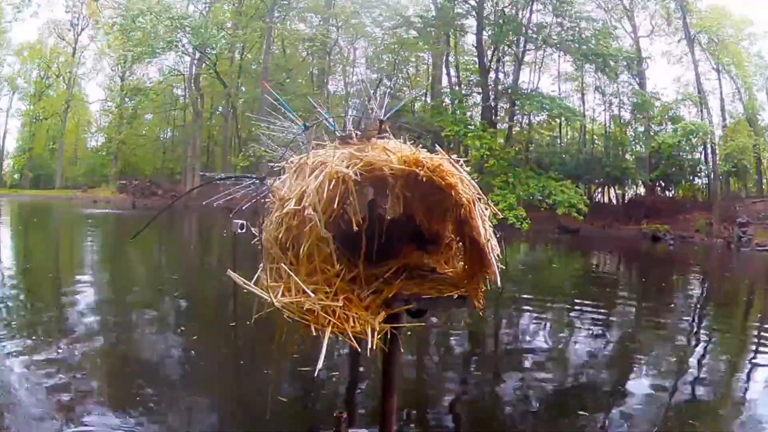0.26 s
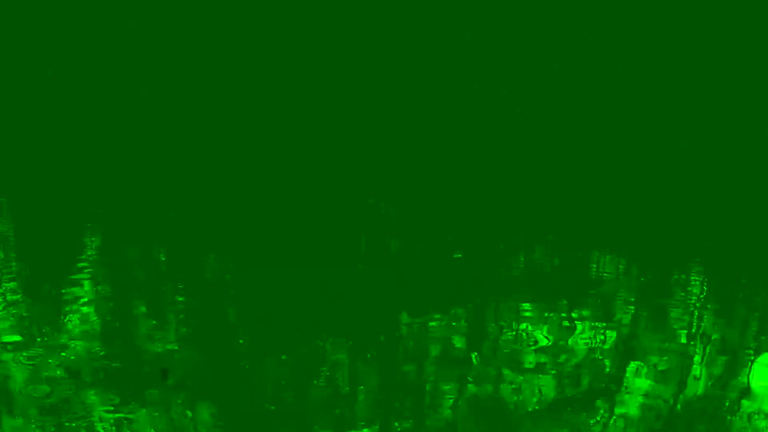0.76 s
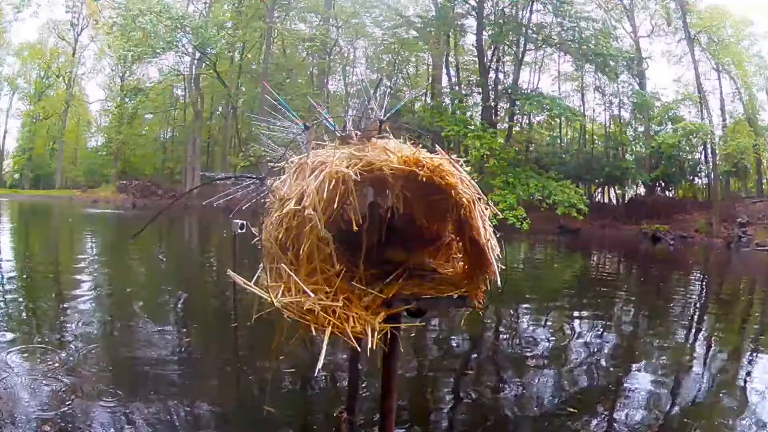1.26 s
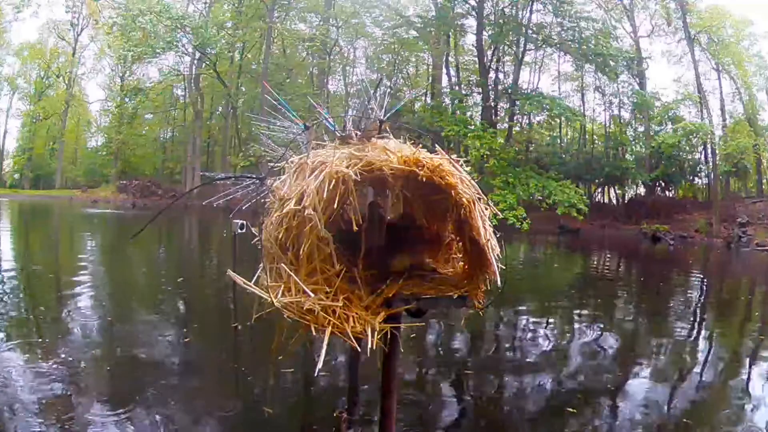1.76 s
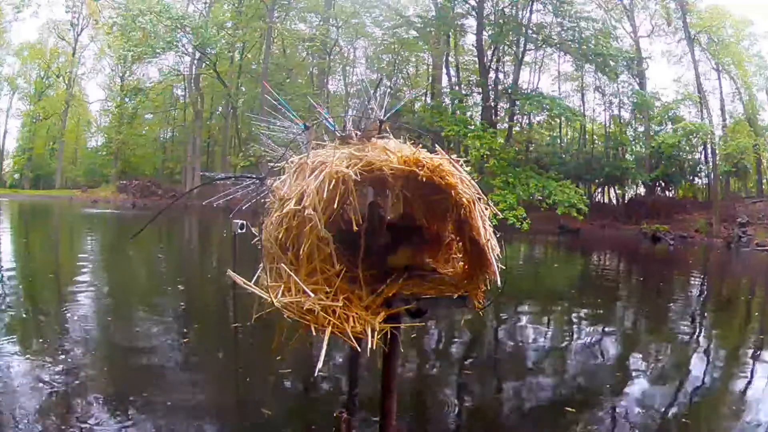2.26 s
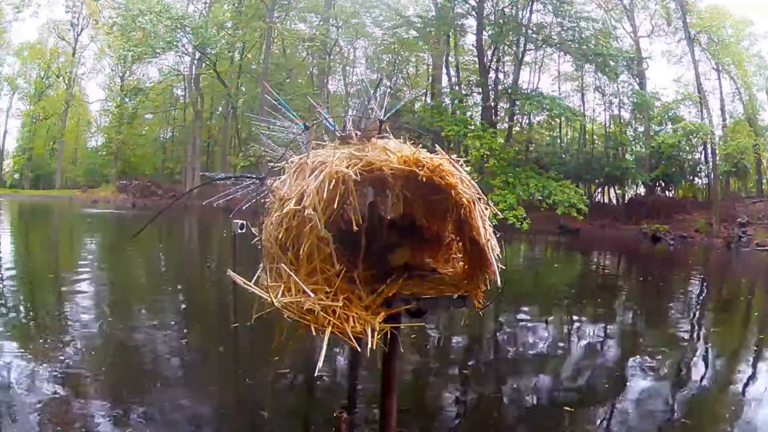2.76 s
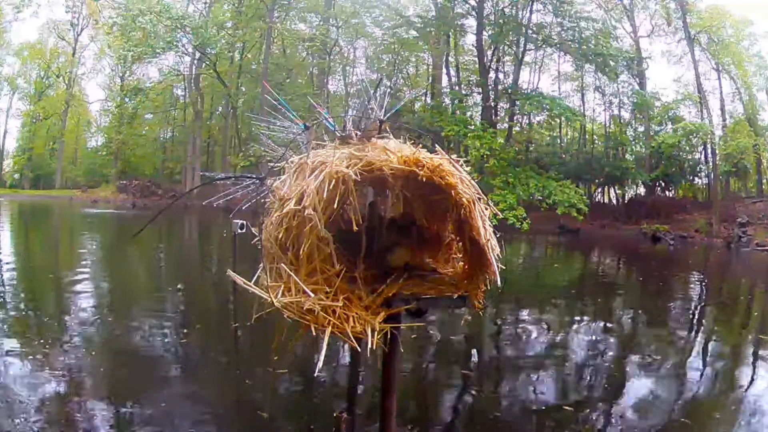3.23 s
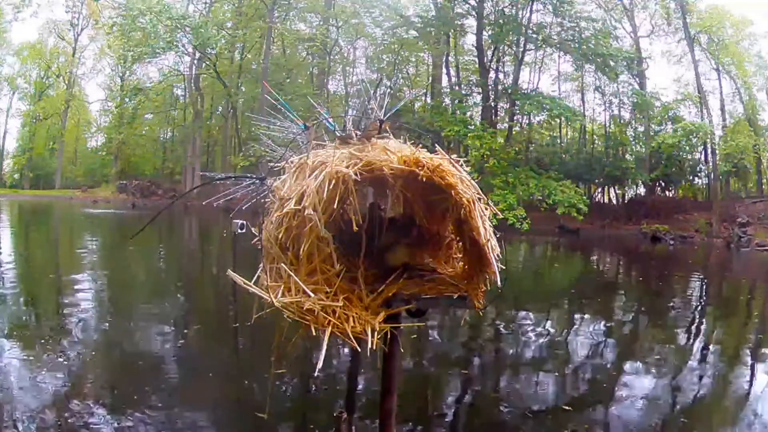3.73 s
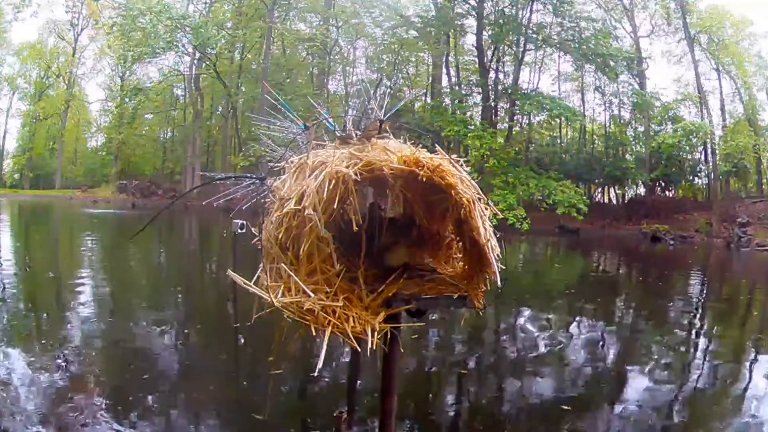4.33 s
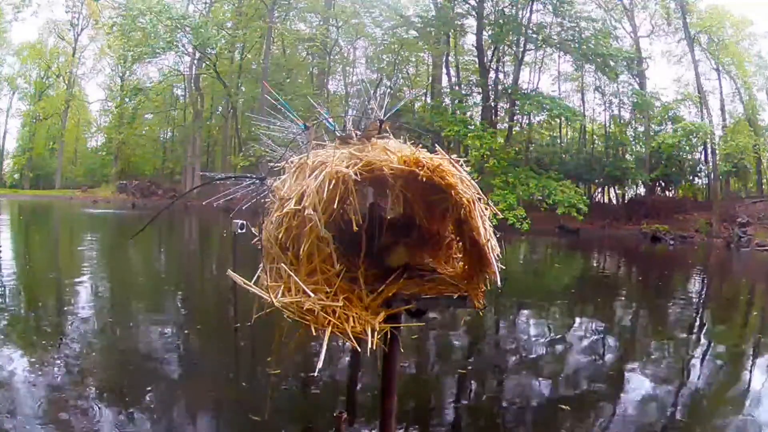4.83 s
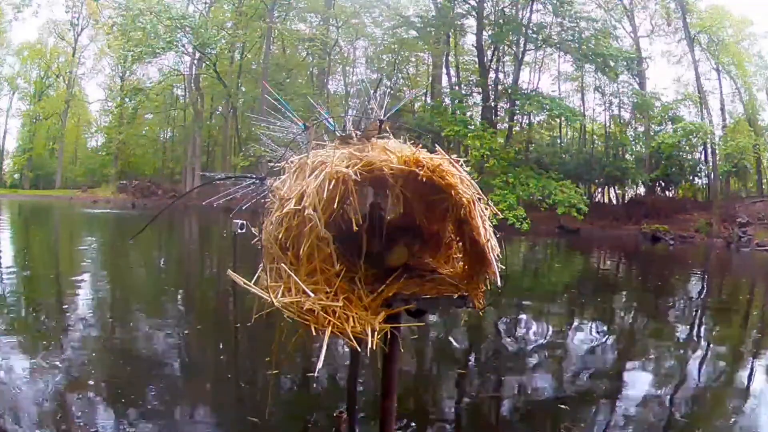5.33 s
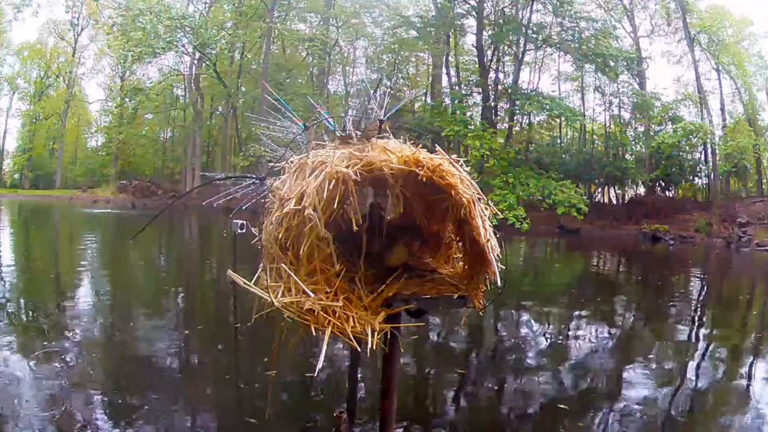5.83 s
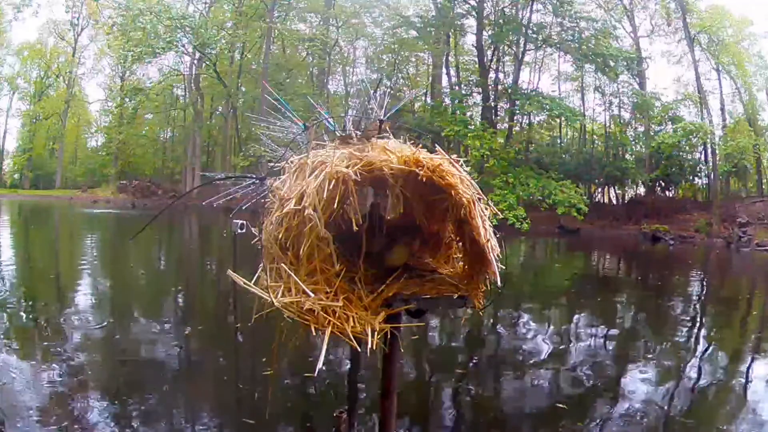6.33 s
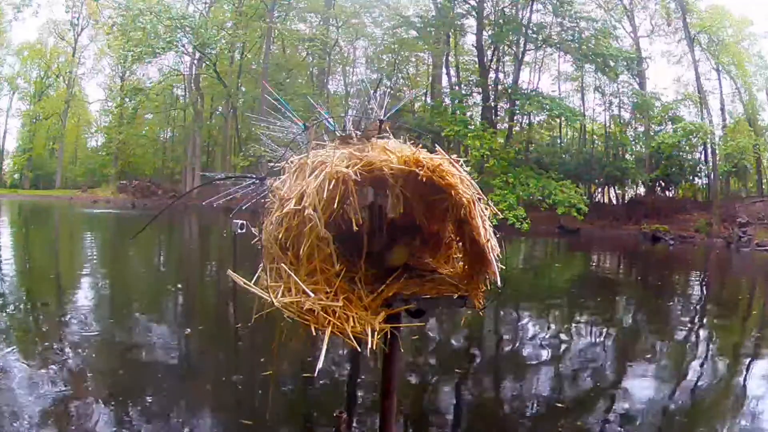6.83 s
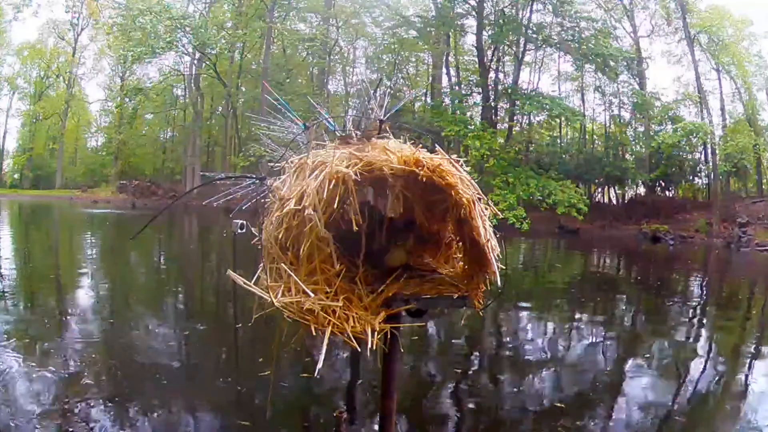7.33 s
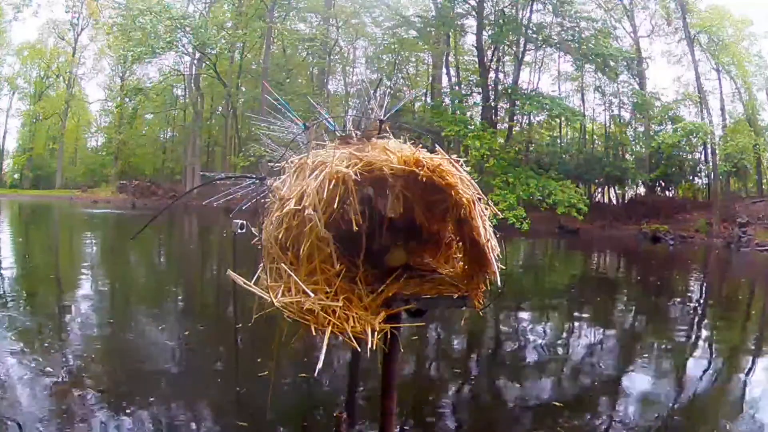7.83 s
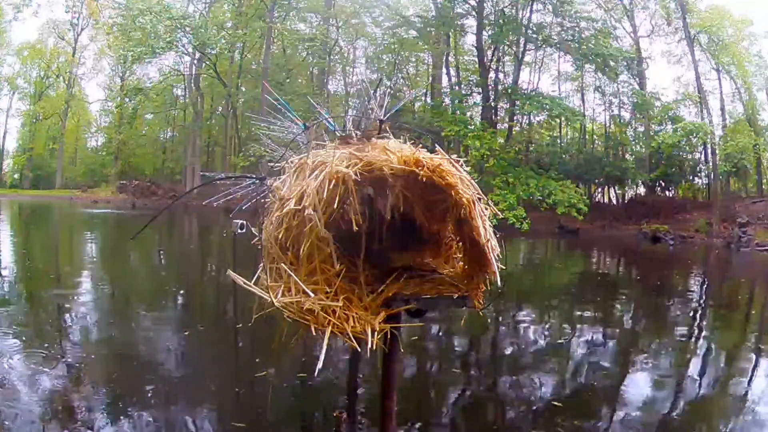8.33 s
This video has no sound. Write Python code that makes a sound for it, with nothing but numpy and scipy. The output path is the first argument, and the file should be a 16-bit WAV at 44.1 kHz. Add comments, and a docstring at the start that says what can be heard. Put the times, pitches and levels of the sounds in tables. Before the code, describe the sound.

A few faint, high calls carry across a wooded pond. From about 0.5 seconds, ducklings peep close to a small microphone at a nest, giving short, high whistles about four or five times a second until roughly 3.3 seconds. The louder peeps break up with a buzzy, stuttering crackle and leave a thin ring. The peeping then becomes sparser, with strong peeps near 4.4 and 6 seconds. Softer, slightly lower peeps follow, turning faint from 7.5 seconds to the end at about 8.5. Distant peeps answer throughout, blurred and lightly echoed by the trees. A quiet, raspy, rattling duck call joins around 1.6 to 2 seconds, 4.1 to 4.8, near 6.8, and from 7.8 to 8.4. Underneath lie a quiet hiss and a faint, low equipment hum that pulses about once a second.

```python
"""Faint calls cross a pond, then ducklings peep close to a small microphone at a straw nest.
Each peep is a whistle on an arch of pitch; fainter ones answer, blurred and echoed by the woods.
A raspy, rattling call, perhaps the hen's, joins in now and then: uneven pulses ringing a throat.
Under it lie quiet hiss and a faint, beating equipment hum.
The sound breaks up on the peeps: they crackle, and the cracks stutter fifty times a second."""
import sys
import numpy as np
from scipy import signal
from scipy.fft import rfft, irfft
from scipy.io import wavfile
from scipy.ndimage import uniform_filter1d

SR = 44100
rng = np.random.default_rng(int(sys.argv[2]) if len(sys.argv) > 2 else 0)


def transcribe(u):
    """Save the signal u as a 16-bit wav file named by the first command-line argument.

    u: samples, shape (n,) or (channels, n), limited to [-1, 1]; the rate is SR.
    q: integer samples, one column per channel.
    """
    v = np.clip(np.atleast_2d(u).T, -1, 1)
    q = np.round(v * 32767).astype(np.int16)
    wavfile.write(sys.argv[1], SR, q)


N = 378378
TIME_S = np.arange(N) / SR

# Filter curves for three noises and the microphone. Each row: frequency in Hz, gain in dB.
AIR_CURVE = [(15, -25.5), (30, -12), (55, -13), (90, -13.5), (200, -15), (400, -14), (800, -21),
             (1500, -22.5), (2100, -17.5), (2700, -18.5), (4800, -18.5), (5500, -22.5), (8000, -28.5),
             (10000, -68.5)]
RASP_HISS_CURVE = [(100, -19.5), (500, 0.5), (1000, 3.5), (1700, 5), (3000, -29.5), (4200, 0), (6000, -1.5),
                   (8000, -17.5)]
FIZZ_CURVE = [(60, -10), (500, -10.5), (1200, -15.5), (2200, -6), (3000, -7), (4000, -3), (4700, 4.5),
              (5600, -8.5), (6800, -8.5), (8000, -23.5)]
MICROPHONE_CURVE = [(30, -1), (100, 1), (250, 1.5), (700, -1), (1300, 0.5), (2200, 0), (2900, -1),
                    (3800, -0.5), (4800, -0.5), (5600, -0.5), (6500, 1.5), (7200, -4.5), (7900, -17)]
# Rasps, near or far. Each row: start and end in seconds, level in dB.
RASP_CALLS = [(0.01, 0.047, -64.5), (0.239, 0.298, -67), (1.623, 1.767, -61), (1.78, 2.084, -63.5),
              (4.117, 4.187, -56), (4.228, 4.318, -57.5), (4.37, 4.453, -53), (4.535, 4.613, -57),
              (4.777, 4.825, -54.5), (6.764, 6.83, -52), (6.821, 6.889, -49), (7.802, 7.88, -57.5),
              (7.883, 7.953, -53.5), (7.97, 8.053, -65), (8.054, 8.173, -52), (8.196, 8.303, -65),
              (8.303, 8.421, -50.5)]
# Runs of cracks that stand out of the crackle. Each row: time in seconds, size in dB, count.
CRACK_RUNS = [(0.541, -27.5, 2), (0.5509, -22.5, 1), (0.5857, -26.5, 2), (0.791, -26, 1),
              (0.8343, -19.5, 3), (0.845, -26, 8), (0.8514, -24, 2), (1.0511, -31, 1), (1.1, -21, 2),
              (1.1063, -24, 2), (1.1509, -29.5, 3), (1.346, -29.5, 3), (1.3698, -23.5, 2),
              (1.3816, -24.5, 1), (1.415, -23, 2), (1.4722, -30, 3), (1.9855, -36.5, 2), (2.15, -25, 1),
              (2.1856, -24.5, 2), (2.3772, -29.5, 2), (2.6257, -33, 3), (2.6983, -28, 2),
              (2.7256, -38.5, 4), (2.9517, -26, 2), (3.0065, -31, 3), (3.2102, -34, 2), (4.4266, -30.5, 1),
              (4.4855, -31, 6), (5.505, -36.5, 2), (6.0471, -24, 1), (6.0815, -34, 3), (7.042, -31, 3),
              (8.13, -39, 3)]
# Calls from across the water. Each row: start and end in seconds, level in dB, pitch and drop in Hz.
ANSWER_CALLS = [(0.04, 0.106, -56.5, 3730, 340), (0.227, 0.309, -53, 4320, 66),
                (0.302, 0.346, -46.5, 3930, 23), (0.408, 0.516, -52, 4990, 126),
                (0.703, 0.795, -50.5, 4990, 400), (2.534, 2.598, -52, 5110, 20),
                (2.815, 2.914, -49.5, 5170, 24), (3.179, 3.244, -49, 5125, 53),
                (4.294, 4.385, -59.5, 5140, 150), (4.613, 4.737, -55.5, 5080, 24),
                (4.771, 4.839, -53, 3534, 370), (5.798, 5.917, -55.5, 3780, 380),
                (7.335, 7.409, -48, 4720, 27), (7.457, 7.483, -51, 4540, 18), (7.65, 7.729, -49, 4234, 95)]
# Quick flicks of the voice around peeps.
# Each row: start and end in seconds, level in dB, first and last pitch in Hz.
VOICE_FLICKS = [(0.353, 0.361, -41.5, 4040, 4350), (0.8, 0.807, -24, 4470, 4480),
                (0.884, 0.898, -47.5, 4700, 3650), (1.04, 1.046, -39.5, 4800, 4560),
                (1.061, 1.067, -28.5, 4730, 4655), (1.667, 1.679, -49.5, 4650, 3610),
                (2.053, 2.065, -43, 4500, 3570), (2.073, 2.08, -41, 4770, 3800),
                (2.128, 2.134, -45.5, 3930, 4610), (2.136, 2.15, -35, 4720, 4340),
                (2.229, 2.237, -46.5, 4740, 3600), (2.9, 2.906, -28.5, 4370, 4600),
                (3.011, 3.027, -36.5, 4720, 3745), (3.031, 3.043, -36.5, 4600, 3870),
                (3.202, 3.214, -43, 4050, 4550), (3.288, 3.302, -30, 4904, 4580),
                (3.329, 3.343, -40, 4730, 3500), (4.002, 4.012, -33.5, 4420, 4700),
                (4.098, 4.119, -52, 4410, 3580), (4.456, 4.462, -30, 4850, 4750),
                (4.46, 4.486, -48.5, 4470, 3800), (4.743, 4.769, -55.5, 4650, 3900),
                (5.042, 5.057, -59.5, 5050, 4450), (5.378, 5.375, -54, 5200, 4700),
                (5.616, 5.63, -45.5, 5290, 4770), (6.776, 6.784, -50, 3950, 3650)]
# Shredded tails trailing peeps. Each row: start and end in seconds, level in dB, pitch in Hz.
PEEP_TAILS = [(1.131, 1.201, -40, 4787), (2.35, 2.41, -38.5, 4784), (2.67, 2.723, -37, 4884),
              (4.431, 4.473, -37, 4795), (5.692, 5.72, -52.5, 4830), (6.458, 6.509, -46, 3950),
              (6.78, 6.817, -47, 4035), (7.085, 7.145, -49, 4080), (8.423, 8.495, -56, 4780)]
# Peeps at the nest. Each row: start and end in seconds, level in dB, mid pitch in Hz,
# start-to-end glide in Hz, raggedness from 0 to 1, fade in seconds.
NEST_PEEPS = [(0.498, 0.559, -33, 4554, 95.5, 0.99, .027), (0.561, 0.621, -30.5, 4600, -6.5, 0.73, .001),
              (0.808, 0.879, -27.5, 4690, -100, 0.33, .001), (1.069, 1.133, -29, 4733, -20.5, 0.53, .002),
              (1.32, 1.404, -30.5, 4787, -110, 0.22, .001), (1.408, 1.476, -33, 4810, 60, 0.5, .004),
              (1.575, 1.669, -28.5, 4760, -150, 0.04, .014), (1.853, 1.943, -29, 4785, -170, 0, .013),
              (1.943, 2.045, -37.5, 4737, 59, 0.41, .004), (2.151, 2.228, -29.5, 4764, -110, 0.25, 0.013),
              (2.266, 2.337, -32, 4677, 89, 0.28, 0.011), (2.6, 2.668, -31.5, 4674, 26.5, 0.3, .001),
              (2.918, 3.003, -29.5, 4830, 55, 0.31, .018), (3.239, 3.321, -38.5, 4767, -49.5, 0.48, .016),
              (3.586, 3.69, -37.5, 4725, 190, 0.72, 0.0075), (4.007, 4.04, -41, 4830, -40, 0, 0.007),
              (4.066, 4.096, -32.5, 4750, -83, 0.8, .015), (4.382, 4.424, -26.5, 4680, 71.5, .15, 0.019),
              (5.068, 5.166, -42.5, 4330, 178.5, 0.65, .006), (5.375, 5.487, -37, 4606, 2, 0.8, .008),
              (5.617, 5.688, -38.5, 4773, -130, 0.46, .011), (5.998, 6.066, -30.5, 4663, 30.5, .2, .003),
              (6.083, 6.191, -42, 4073, -28.5, 0.75, .011), (6.38, 6.465, -40, 4120, -70, 0.32, .009),
              (6.694, 6.774, -40, 4090, -20, 0.44, 0.0039), (7.015, 7.086, -40.5, 4122, -100, 0.31, .002),
              (7.334, 7.406, -43, 4125, -19, 0.6, .002), (7.587, 7.654, -53, 4670, -480, 1, 0.0022),
              (7.732, 7.793, -48, 4830, 118.5, 0.64, .006), (7.818, 7.948, -52.5, 4695, -66.5, 0.42, .01),
              (7.956, 8.057, -49.5, 4203, -400, 0.22, .007), (8.099, 8.238, -56, 4830, -91, 0.21, 0.0045),
              (8.355, 8.432, -43.5, 4760, -54, 0.54, .008)]

STUTTER_S = .02
CRACKLE_DB, LOUD_PEEP_DB, CRACKLE_DB_PER_DB = -33, -31, .5  # size on a loud peep; slope with level
CRACKLE_WAIT_S, CRACKLE_FULL_RAGGED = .016, 0.37
ANSWER_EARLY_SHARE, ANSWER_RAGGED, ANSWER_FADE_S = .9, .85, 0.0062  # share: of the drop, in first half
FLICK_ARCH_HZ, FLICK_RAGGED, FLICK_FADE_S = 130, 0.28, .003
SCOOP_S, SCOOP_DB, SCOOP_HZ = .012, -22, 450  # faint slide up into each peep
TAIL_SAG_HZ, TAIL_RAGGED, TAIL_FADE_S = 130, 0.96, 0.0019
CLEAN_ARCH_HZ, BROKEN_ARCH_HZ, FLAT_RAGGED = 225, 40, .09  # a little raggedness flattens the arch


def amp(db):
    return 10 ** (np.asarray(db) / 20)


def unit_rms(x):
    return x / np.sqrt(np.mean(x ** 2) + 1e-20)


def colour(x, curve):
    """Filter by a curve of (Hz, dB) points."""
    hz, db = np.transpose(curve)
    gain_db = np.interp(np.log(np.fft.rfftfreq(N, 1 / SR) + 1), np.log(hz), db)
    return irfft(rfft(x) * amp(gain_db), N)


def drift(hz):
    """Smooth noise of rms 1, bandwidth about hz."""
    lowpass = np.exp(-(np.fft.rfftfreq(N, 1 / SR) / hz) ** 2)
    return unit_rms(irfft(rfft(rng.standard_normal(N)) * lowpass, N))


def resonate(x, hz, width_hz):
    """One damped resonance."""
    radius = np.exp(-np.pi * width_hz / SR)
    return signal.lfilter([1 - radius], [1, -radius * np.exp(2j * np.pi * hz / SR)], x).real


def stutter(x, feedback):
    """Part of the sound returns every stutter period: a buzzy grain, rms 1."""
    size = round(STUTTER_S * SR)
    blocks = np.pad(x, (0, -N % size)).reshape(-1, size)
    return unit_rms(signal.lfilter([1], [1, -feedback], blocks, axis=0).ravel()[:N])


def air(level_db=-65, flicker_db=1.7):
    """Quiet, flickering hiss of pond and woods."""
    gain = amp(level_db + flicker_db * drift(74))
    return gain * stutter(colour(rng.standard_normal(N), AIR_CURVE), 0.32)


def hum(hz=151.1, waver=0.004, level_db=-69.5, beat_s=.926, crest_s=0.35, second_tone_db=-5.5):
    """Two low equipment tones, almost in tune, beat about once a second."""
    turns = np.cumsum(hz * (1 + waver * drift(6.4))) / SR
    slip = (TIME_S - crest_s) / beat_s
    second_tone = amp(second_tone_db) * np.sin(2 * np.pi * (turns - slip))
    return amp(level_db) * unit_rms(np.sin(2 * np.pi * turns) + second_tone)


def woods(x, t60_s, wet_db):
    """Trees round the pond return a thin tail."""
    t = TIME_S[:SR]
    tail = rng.standard_normal(SR) * amp(-60 * t / t60_s) * (1 - np.exp(-t / 0.015))
    return amp(wet_db) * signal.fftconvolve(x, tail / np.linalg.norm(tail))[:N]


def far_field(peeps, limit_db=-44):
    """Near or far, ducklings are about equally loud at the trees, so faint ones are wettest."""
    return peeps.real / (1 + abs(peeps) / amp(limit_db))


def scatter(x, t60_s=0.044, gain_db=1.0):
    """Many short paths blur far voices; the level follows the input."""
    t = TIME_S[:SR // 4]
    paths = rng.standard_normal(len(t)) * amp(-60 * t / t60_s)
    blurred = signal.fftconvolve(x, paths / np.linalg.norm(paths))[:N]
    power_in, power_out = abs(uniform_filter1d(np.array([x, blurred]) ** 2, size=3500)) + 1e-10
    return amp(gain_db) * blurred * np.sqrt(power_in / power_out)


def ringing(peeps, hz=4780, width_hz=110):
    """A faint narrow ring hangs on after the peeps."""
    tail = woods(far_field(peeps), t60_s=1.9, wet_db=3)
    return resonate(resonate(tail, hz, width_hz), hz, width_hz)


def rasp_gate(start_s, end_s, attack_s=.008, release_s=0.011):
    """Opens quickly, holds, dies away after the end."""
    attack = np.clip((TIME_S - start_s) / attack_s, 0, 1)
    return attack * np.exp(-np.clip((TIME_S - end_s) / release_s, 0, 20))


def rasp(pulse_hz=150, jitter=.22, throat_hz=2140, puff_turns=0.74, hiss_db=-12):
    """Uneven pulses, each with a noise puff, ring one throat resonance; some wide hiss goes along."""
    turns = np.cumsum(pulse_hz * (1 + jitter * drift(100))) / SR
    puffs = unit_rms(np.exp(-(turns % 1) / puff_turns) * rng.standard_normal(N))
    pulses = unit_rms(np.diff(np.floor(turns), prepend=0))
    throat = puffs + pulses
    for width_hz in (400, 1100, 1100):
        throat = resonate(throat, throat_hz, width_hz)
    hiss = amp(hiss_db) * unit_rms(colour(puffs, RASP_HISS_CURVE))
    voice = stutter(unit_rms(throat) + hiss, 0.42)
    voice /= np.sqrt(uniform_filter1d(voice ** 2, size=1100))  # level held over 25 ms
    envelope = np.max([amp(db) * rasp_gate(start_s, end_s) for start_s, end_s, db in RASP_CALLS], axis=0)
    return envelope * voice


def fizz(blips, gain_db=-12):
    """Buzzy hiss round the cracks."""
    envelope = np.sqrt(abs(uniform_filter1d(uniform_filter1d(blips ** 2, size=882), size=441)))
    return amp(gain_db) * envelope * stutter(colour(rng.standard_normal(N), FIZZ_CURVE), 0.8)


def crackle_envelope():
    """Stronger on loud, ragged peeps and tails; zero between them."""
    envelope = np.zeros(N)
    for start_s, end_s, db, *_, ragged, _ in peep_notes():
        crack_db = CRACKLE_DB + CRACKLE_DB_PER_DB * (db - LOUD_PEEP_DB)
        span = slice(round((start_s + CRACKLE_WAIT_S) * SR), round(end_s * SR))
        envelope[span] = amp(crack_db) * min(ragged / CRACKLE_FULL_RAGGED, 1)
    return envelope


def cracks(length_s=0.00048, length_spread=.3, spread_db=5, run_count=2):
    """Runs of square blips a stutter period apart: one new run a period on peeps, plus listed runs."""
    blips, envelope = np.zeros(N), crackle_envelope()
    periods = int(N / SR / STUTTER_S) - run_count - 1
    for period, (place, strength, stretch) in enumerate(rng.uniform(-1, 1, (periods, 3))):
        width = round(length_s * (1 + length_spread * stretch) * SR)
        for k in range(run_count):
            at = round((period + (1 + place) / 2 + k) * STUTTER_S * SR)
            blips[at:at + width] = envelope[at] * amp(spread_db * strength)
    for (time_s, db, count), stretch in zip(CRACK_RUNS, rng.uniform(-0.7, 1, len(CRACK_RUNS))):
        width = round(length_s * (1 + length_spread * stretch) * SR)
        for k in range(count):
            at = round((time_s + k * STUTTER_S) * SR) - width // 2
            blips[at:at + width] = amp(db)
    return blips


def break_up(whistles, blips, tick_hz=4600, takeover_db=-56, ceiling_db=-21.5):
    """A blip notches or inverts a whistle; between whistles it ticks. Peaks are limited."""
    carrier = whistles + amp(takeover_db) * np.exp(2j * np.pi * tick_hz * TIME_S)
    broken = whistles - blips * np.exp(1j * np.angle(carrier))
    return broken.real / np.maximum(abs(broken) / amp(ceiling_db), 1)


def peep_notes():
    """Arched peeps and sagging tails, as notes for ducklings()."""
    for start_s, end_s, db, hz, glide_hz, ragged, fade_s in NEST_PEEPS:
        foot_hz = hz - BROKEN_ARCH_HZ - (CLEAN_ARCH_HZ - BROKEN_ARCH_HZ) * np.exp(-ragged / FLAT_RAGGED)
        yield start_s, end_s, db, foot_hz - glide_hz / 2, hz, foot_hz + glide_hz / 2, ragged, fade_s
    for start_s, end_s, db, hz in PEEP_TAILS:
        yield start_s, end_s, db, hz + TAIL_SAG_HZ / 2, hz, hz - TAIL_SAG_HZ / 2, TAIL_RAGGED, TAIL_FADE_S


def all_notes():
    """Peeps and tails, answers that drop and level out, flicks and scoops."""
    yield from peep_notes()
    for start_s, end_s, db, hz, drop_hz in ANSWER_CALLS:
        first_hz = hz + ANSWER_EARLY_SHARE * drop_hz
        yield start_s, end_s, db, first_hz, hz, first_hz - drop_hz, ANSWER_RAGGED, ANSWER_FADE_S
    scoops = [(start_s - SCOOP_S, start_s, db + SCOOP_DB, hz - SCOOP_HZ, hz)
              for start_s, _, db, hz, *_ in NEST_PEEPS]
    for start_s, end_s, db, first_hz, last_hz in VOICE_FLICKS + scoops:
        mid_hz = (first_hz + last_hz) / 2 + FLICK_ARCH_HZ
        yield start_s, end_s, db, first_hz, mid_hz, last_hz, FLICK_RAGGED, FLICK_FADE_S


def ducklings(flutter_db=10, waver=.02, fuzz=0.26, fuzz_hz=900, far_db=-49, blend_db=6.5):
    """Pure whistles on pitch arches; ragged ones flutter, waver and fuzz. Returns complex near, far."""
    flutter = np.minimum(stutter(drift(150), 0.61), .6)
    wobble = stutter(drift(300), .6)
    grain = stutter(drift(fuzz_hz), .8) + 1j * stutter(drift(fuzz_hz), .8)
    near, far = np.zeros((2, N), complex)
    for start_s, end_s, db, first_hz, mid_hz, last_hz, ragged, fade_s in all_notes():
        span = slice(round(start_s * SR), round(end_s * SR))
        u = np.linspace(-1, 1, len(TIME_S[span]))
        pitch_hz = mid_hz + (last_hz - first_hz) / 2 * u + ((first_hz + last_hz) / 2 - mid_hz) * u ** 2
        turns = np.cumsum(pitch_hz * (1 + waver * ragged * wobble[span])) / SR
        fades = np.minimum((1 - abs(u)) * (end_s - start_s) / 2 / fade_s, 1)
        envelope = amp(db) * fades * unit_rms(amp(flutter_db * ragged * flutter[span]))
        whistle = envelope * np.exp(2j * np.pi * turns) * (1 + fuzz * ragged * grain[span])
        nearness = (1 + np.tanh((db - far_db) / blend_db)) / 2  # faint peeps come from further off
        near[span] += np.sqrt(nearness) * whistle
        far[span] += np.sqrt(1 - nearness) * whistle
    return near, far


def scene():
    """Mono mix of ducks, echoes and background."""
    blips, rattle = cracks(), rasp()
    near, far = ducklings()
    echoes = woods(far_field(near + far), t60_s=0.36, wet_db=-10.5)
    echoes += woods(rattle, t60_s=0.37, wet_db=-7.0)
    ducks = break_up(near, blips) + scatter(far.real) + ringing(near) + rattle
    return (ducks + fizz(blips) + echoes + hum() + air())[None]


def record(dry, cutoff_hz=8050):
    """Narrow-band recorder: the top rolls off, then ends."""
    sound = colour(dry[0], MICROPHONE_CURVE)
    lowpass = signal.firwin(301, cutoff_hz, window=("kaiser", 8), fs=SR)
    return signal.oaconvolve(sound, lowpass, "same")[None]


dry = scene()
out = record(dry)
transcribe(out)
```